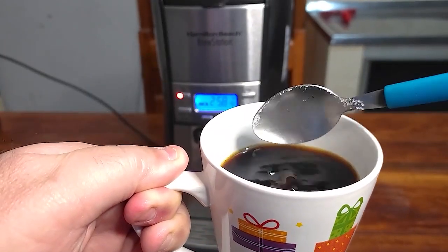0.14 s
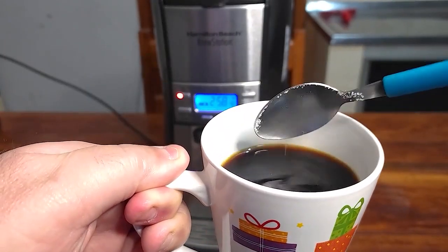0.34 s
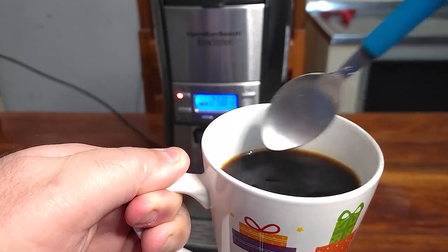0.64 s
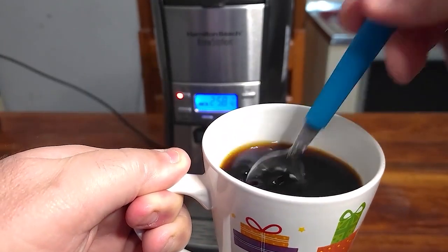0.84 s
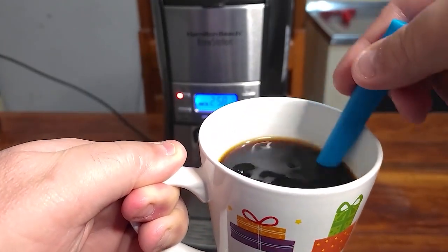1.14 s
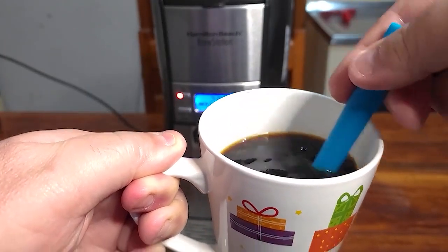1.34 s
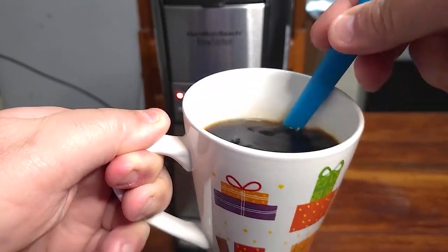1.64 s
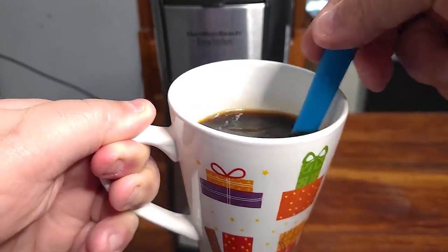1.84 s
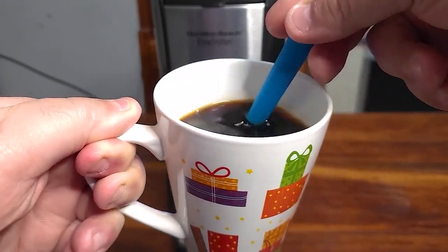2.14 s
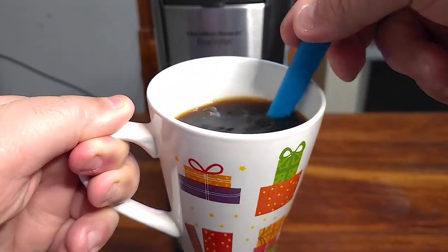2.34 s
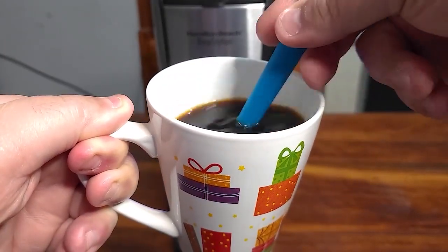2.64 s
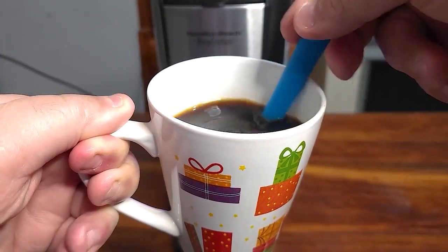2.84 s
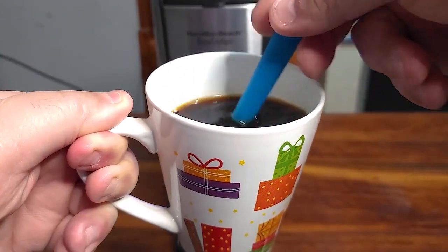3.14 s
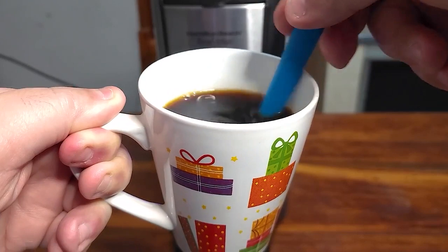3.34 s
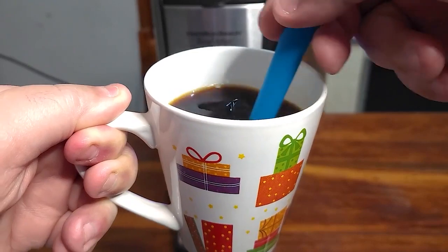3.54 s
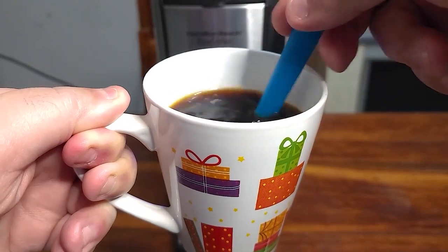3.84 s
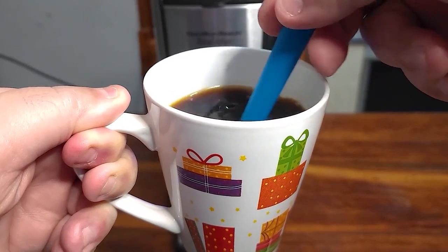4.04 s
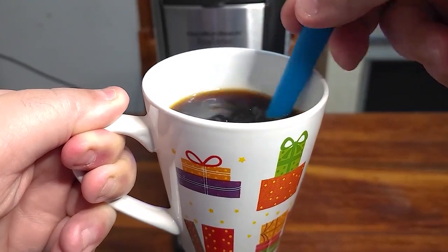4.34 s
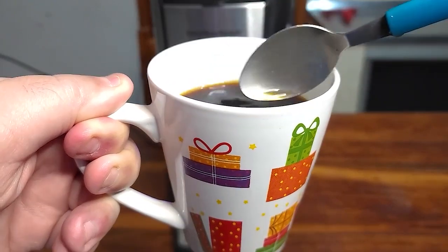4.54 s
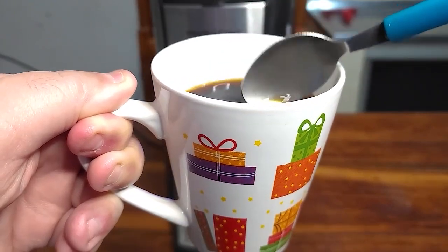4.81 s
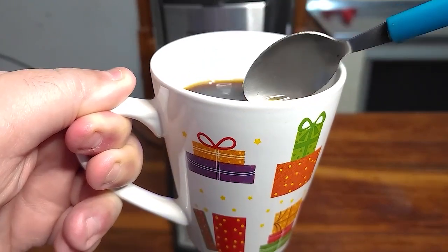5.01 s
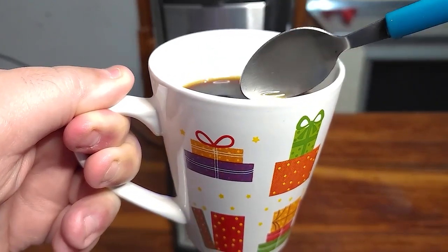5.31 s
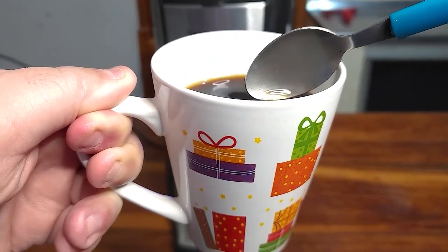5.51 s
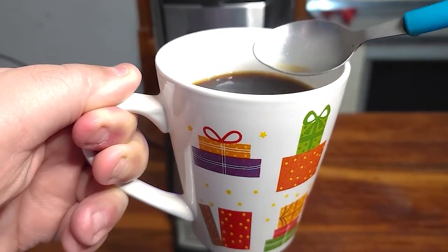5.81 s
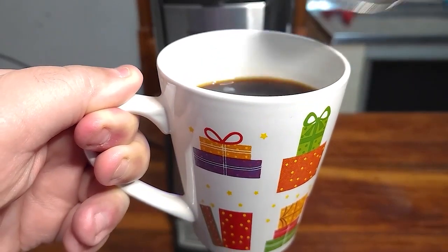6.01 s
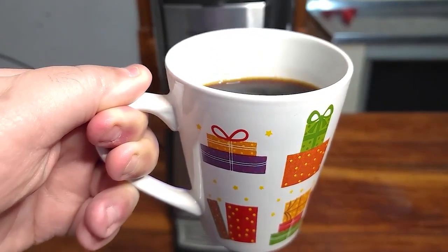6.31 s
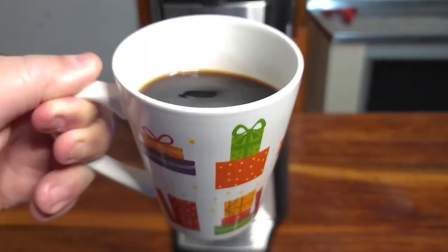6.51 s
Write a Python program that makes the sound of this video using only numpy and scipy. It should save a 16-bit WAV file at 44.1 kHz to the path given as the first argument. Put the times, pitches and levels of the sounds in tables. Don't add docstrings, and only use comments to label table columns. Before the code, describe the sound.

Close in a quiet kitchen, a dry metal spoon strikes a ceramic mug's rim with one bright, short clink. After a pause it stirs the coffee with irregular damped clinks, dull wall knocks and faint sugary scraping. Several ringing rim taps follow, alternately firm and soft, ending on a firm one. A low fridge hum lies beneath; a phone's noise suppression thins the background after loud hits.

```python
import sys
import numpy as np
from scipy import signal
from scipy.fft import rfft, irfft
from scipy.io import wavfile
from scipy.ndimage import uniform_filter1d

SR = 44100
rng = np.random.default_rng(int(sys.argv[2]) if len(sys.argv) > 2 else 0)


def how_loud(loudness_db):
    steps = np.asarray(loudness_db, float) / 20
    return 10 ** steps


def store_pcm(level_fs):
    pcm = np.round(np.clip(level_fs, -1, 1) * 32767).astype(np.int16)
    wavfile.write(sys.argv[1], SR, np.atleast_2d(pcm).T)


N = 293946


def evened(x):
    return x / np.sqrt(np.mean(x ** 2) + 1e-20)


def smoothed_twice(x, size, axis=-1):
    return uniform_filter1d(uniform_filter1d(x, size, axis=axis), size, axis=axis)


def read_spectrum(points, hz):
    point_hz, value = np.transpose(points)
    return np.interp(np.log(hz + 1), np.log(point_hz + 1), value)


def shaped_noise(db, size):
    real, imag = rng.standard_normal((db.shape[1], db.shape[0], 2)).T
    spectra = (real + 1j * imag) * how_loud(db)
    return signal.istft(spectra, nperseg=size, noverlap=size * 3 // 4)[1][:N]


def patchy_hiss(spectrum, tilt_db, patchy_db):
    hz = np.fft.rfftfreq(512, 1 / SR)
    patches = rng.standard_normal((len(tilt_db), len(hz)))
    patches = uniform_filter1d(patches, size=24, axis=0)
    patches = evened(uniform_filter1d(patches, size=7, axis=1)).T
    octaves = np.log2(np.maximum(hz, 500) / 4000)[:, None]
    db = read_spectrum(spectrum, hz)[:, None] + patchy_db * patches + tilt_db * octaves
    return evened(shaped_noise(db, size=512))


def fridge():
    # (frequency [Hz], level [dB])
    hum_lines = [(34, -65.5), (60.1, -53.5), (78, -60.5), (118.5, -64), (180.4, -59), (241, -67),
                 (301, -67.5), (361, -69.5), (421, -71.5), (541, -81), (601, -79), (1020, -78.5),
                 (2150, -81)]
    # (frequency [Hz], level [dB per Hz])
    rumble_spectrum = [(12, -41.5), (20, -10.5), (59, 0), (103, -8), (136, -9), (176, 0), (209, -10.5),
                       (298, -6), (327, -14), (425, -9.5), (511, -17.5), (800, -28.5), (1040, -57),
                       (1760, -120)]
    rumble_db, waver_db = -53, 2.0
    t = np.arange(N) / SR
    wobbles = evened(smoothed_twice(rng.standard_normal((len(hum_lines), N // 256 + 1)), 12))
    hum = np.zeros(N)
    for (line_hz, line_db), wobble in zip(hum_lines, wobbles):
        drift = np.interp(t, np.arange(len(wobble)) * 256 / SR, wobble)
        hum += how_loud(line_db + waver_db * drift) * np.sin(2 * np.pi * (line_hz * t + rng.random()))
    hz = np.fft.rfftfreq(4096, 1 / SR)
    shape_db = read_spectrum(rumble_spectrum, hz)[:, None] + np.zeros(N // 1024 + 5)
    return np.sqrt(2) * hum + how_loud(rumble_db) * evened(shaped_noise(shape_db, size=4096))


def air():
    # (frequency [Hz], level [dB per Hz])
    air_spectrum = [(410, -31), (700, 0), (1420, -3.5), (1750, -8.5), (2240, -10), (4990, -24), (6150, -19),
                    (8420, -26), (10100, -43.5), (16000, -58.5)]
    # (time [s], level [dB])
    air_course = [(0, -62.5), (0.102, -62.5), (0.501, -68.5), (1.2, -68.5), (2.5, -66.5), (4.5, -70),
                  (6.2, -70), (6.67, -65)]
    time_s, course_db = np.transpose(air_course)
    gain = how_loud(np.interp(np.arange(N) / SR, time_s, course_db))
    return gain * patchy_hiss(air_spectrum, np.zeros(N // 128 + 5), patchy_db=1.5)


def grit():
    # (start [s], length [s], share before the peak [0-1],
    # peak level [dB], brightness [dB per octave])
    strokes = [(1.078, 0.383, 0.374, -66, -0.5), (1.521, 0.3352, 0.583, -50.5, 2.5),
               (1.902, 0.105, 0.11, -71.5, -3), (2.039, 0.209, 0.82, -73, 8.5),
               (2.218, 0.285, 0.59, -62, 0.5), (2.618, 0.152, 0.835, -63.5, 2),
               (2.765, 0.39, 0.063, -60.5, -2.5), (3.18, 0.272, 0.21, -58.5, 4.5),
               (3.727, 0.293, 0.088, -62.5, 6), (4.277, 0.202, 0.59, -61, -3),
               (6.284, 0.278, 0.372, -59, -3)]
    # (frequency [Hz], level [dB per Hz])
    hiss_spectrum = [(880, -7), (1500, -1), (1640, -7), (2180, -1.5), (2900, -5.5), (4380, -9), (4780, -10),
                     (7080, -9), (9150, -17.5), (15700, -23)]
    # (frequency [Hz], level [dB], t60 [s])
    singing_modes = [(1649, -1, 0.178), (4840, -12, 0.146), (5600, -2, 0.096), (7300, -17.5, .05)]
    # (stroke start [dB], peak [dB], end [dB])
    singing_course = (-69, -71, -82)
    rise_db, fall_db, onset_tilt_db = -7.5, -19, 1
    t = np.arange(N) / SR
    frame_s = np.arange(N // 128 + 5) * 128 / SR
    start, length, share, peak_db, bright_db = np.transpose(strokes)[:, :, None]
    knots = np.hstack([0 * share, np.clip(share, .02, .98), 1 + 0 * share])
    knot_s = (start + length * knots).ravel()
    hiss_db = (peak_db + [rise_db, 0, fall_db]).ravel()
    tilt_db = (bright_db + [onset_tilt_db, 0, 0]).ravel()
    sing_db = np.tile(singing_course, len(strokes))
    moving = uniform_filter1d(((t > start) & (t < start + length)).any(0) * 1., size=400)
    hiss = patchy_hiss(hiss_spectrum, np.interp(frame_s, knot_s, tilt_db), patchy_db=3.5)
    ring_s, body = t[:8000], np.zeros(8000)
    for mode_hz, mode_db, t60_s in singing_modes:
        body += how_loud(mode_db - 60 * ring_s / t60_s) * np.sin(2 * np.pi * mode_hz * ring_s)
    singing = evened(signal.oaconvolve(rng.standard_normal(N), body)[:N])
    singing = singing * (t < start[-1])
    hiss = how_loud(np.interp(t, knot_s, hiss_db)) * hiss
    return moving * (hiss + how_loud(np.interp(t, knot_s, sing_db)) * singing)


def kitchen_echo(x):
    # (frequency [Hz], t60 [s])
    room_decay = [(800, 0.27), (2000, 0.44), (6000, 0.295), (16000, 0.3)]
    taps = np.zeros(SR // 2)
    at = np.arange(200, SR // 2 - 20, 20)
    taps[at + rng.integers(0, 20, len(at))] = rng.choice([-1., 1.], len(at))
    hz, t, z = signal.stft(taps, SR, nperseg=256)
    decay = how_loud(-60 * t / read_spectrum(room_decay, hz)[:, None])
    tail = signal.istft(z * decay, SR, nperseg=256)[1]
    return signal.fftconvolve(x, tail / np.linalg.norm(tail))[:N]


def family_levels(rows, law):
    time_s, bell_db, lean_db, hard_db = np.transpose(rows)
    wall_db, wall_lean, upper_db, upper_lean, upper_hard = law
    wall = wall_db + wall_lean * lean_db
    upper = upper_db + upper_lean * lean_db + upper_hard * hard_db
    offsets_db = np.array([0 * time_s, lean_db, wall, upper, hard_db])
    return np.column_stack([time_s, (bell_db + offsets_db).T])


def blows(rows, modes, crack_db, crack_s, wash_db, quick_s, oval_s, late_db, spread_db, detune):
    # (low edge [Hz], high edge [Hz])
    family_edges = [
        (5150, 6150),
        (0, 1900),
        (1900, 5150),
        (6150, 9200),
        (9200, 20000),
    ]
    # (frequency [Hz], level [dB], t60 [s])
    oval_modes = [(1575, -15, .2), (1648.7, 3.5, 0.26)]
    hz, db, t60_s = np.transpose(oval_modes + modes)[:, :, None]
    t, out = np.arange(SR // 3) / SR, np.zeros(N + SR)
    damped_s = np.where(hz < 1900, oval_s, quick_s * (2000 / hz) ** 0.62)
    fading = how_loud(-60 * t / np.minimum(t60_s, damped_s))
    late = how_loud(late_db - 60 * t / t60_s)
    flutters = rng.standard_normal((len(rows), len(hz), 50))
    luck = rng.standard_normal((len(rows), len(hz), 2))
    crackle = rfft(rng.standard_normal((len(rows), 8192)))
    band_hz = np.fft.rfftfreq(8192, 1 / SR)
    burst = how_loud(crack_db - 60 * t[:8192] / crack_s) + how_loud(wash_db - 60 * t[:8192] / .16)
    for (time_s, *family_db), chance, contact, flutter in zip(rows, luck, crackle, flutters):
        wavering = 0.46 + np.where(hz < 1900, .25, .9) * signal.resample(flutter, len(t), axis=1)
        glance = np.clip((-36.5 - max(family_db)) / 12, 0, 1)
        pitch_hz = hz * (1 + (0.001 + detune * glance * (hz > 1900)) * chance[:, 1:])
        envelope = how_loud(db + spread_db * chance[:, :1]) * (fading + late * wavering)
        rings = envelope * np.sin(2 * np.pi * pitch_hz * t)
        for (low, high), blow_db in zip(family_edges, family_db):
            ring = rings[(hz[:, 0] >= low) & (hz[:, 0] < high)].sum(0)
            ring /= np.std(ring[:300])
            in_band = (band_hz >= max(low, 1300)) * (band_hz < high)
            ring[:8192] += burst * evened(irfft(contact * in_band))
            onset_s = .0009 + 0.001297 * glance + .0012 * (high < 2000)
            onset = np.minimum(t / onset_s, 1) ** 2
            out[round(time_s * SR):][:len(t)] += how_loud(blow_db) * ring * onset
    return out[:N]




def wall_knocks():
    knock_rows = [(1.6305, -47, 9.5, -16), (1.6385, -48, -5.5, -24), (2.2325, -54, 13, -11),
                  (2.3014, -52.5, 12, -15.5), (2.3549, -53, 11.5, -9), (2.824, -54.5, 16, -12.5),
                  (2.9142, -64.5, 18.5, -2.5), (3.315, -50, 3.5, -15.5), (3.3394, -64.5, 23, -10),
                  (3.4208, -73.5, 13.5, -23.5), (3.6164, -73.5, 17, -25), (3.7576, -63.5, 24, 12),
                  (4.282, -40.5, -0.5, -16), (4.346, -57.5, 17, -10)]
    wall_modes = [(1898, 20, 0.01), (2754, -18, 0.01), (3572, -8, 0.014), (4744, -15, 0.106),
                  (5730, -1, .05), (5558, 4.5, 0.05), (6370, 1, 0.01), (6730, 9, 0.05), (7660, 0.5, 0.19),
                  (9120, -16.5, 0.018), (10805, -0.5, 0.027), (14450, -19, 0.0067)]
    knock_law = (-10, 1.2797, 2, 0.4035, 0.4967)
    return blows(family_levels(knock_rows, knock_law), wall_modes, crack_db=0, crack_s=0.035, wash_db=-21,
                 quick_s=.05, oval_s=0.1, late_db=-17.5, spread_db=1.7, detune=0.043)


def stirring():
    stir_rows = [(1.0877, -53, 13.5, 5.5), (1.176, -71.5, 4.5, -17), (1.3269, -62, 10, -5.5),
                 (1.4975, -73.5, 13.5, -15), (1.5233, -42.5, -31, -20.5), (1.9119, -75, 12, 6.5),
                 (1.9194, -66, -1, -9.5), (1.956, -62.5, -8, -9), (2.054, -27.5, -23.5, -12),
                 (2.2728, -55, -3.5, 1), (2.5056, -82.5, 10, 6.5), (2.6163, -55.5, -9, -16),
                 (2.6803, -38.5, -18.5, -12), (2.7819, -54.5, -4, 4), (2.9863, -49.5, 1, -8),
                 (3.117, -67, -21.5, -30), (3.1878, -48.5, -12.5, -23), (3.285, -46, -31, 5.5),
                 (3.6684, -25.5, -35, -15), (4.0054, -42.5, -3.5, -2.5), (4.132, -28.5, -25.5, -7.5),
                 (4.323, -56, -4.5, -6.5)]
    wet_modes = [(2283, -1, 0.018), (3703, -4, 0.034), (4444, -10.5, .03), (4719, -5, 0.28),
                 (5518.5, 10.5, 0.137), (6036, -8.5, 0.193), (6492, 13.5, 0.1), (7120, 8.5, 0.23),
                 (8250, 12, 0.23), (8740, 11.5, 0.123), (10680, 16, 0.13), (11413, 3.5, 0.2),
                 (13220, 5.5, 0.1), (15120, -5.5, .1)]
    stir_law = (1.5, 0.516, 1.75, 0.14, 0.487)
    return blows(family_levels(stir_rows, stir_law), wet_modes, crack_db=-3.24, crack_s=0.0464,
                 wash_db=-20.5, quick_s=0.046, oval_s=0.052, late_db=-21.5, spread_db=10.0, detune=0.024)


def sugar_shake():
    shake_rows = [
        (0.504, -16, -2.5, -14.5),
        (0.5137, -34.5, 4.5, -13.5),
    ]
    loose_modes = [(857, -18, 0.052), (1964, 0, 0.11), (2496, -7.5, .26), (3465.8, -10, 0.33),
                   (4662, -6, 0.48), (4860, 6.5, 0.041), (5576, 0, 0.11), (6486, 5, 0.23),
                   (6685, -1.5, .15), (8010, 2, .17), (8254, -2, .3), (9930, 5, 0.055), (10960, -3.5, 0.24),
                   (13220, 0.5, .12)]
    shake_law = (-0.5, 1.23, 1.5, -1.05, 0.3374)
    return blows(family_levels(shake_rows, shake_law), loose_modes, crack_db=-3.5, crack_s=0.014,
                 wash_db=-19.5, quick_s=0.02, oval_s=0.036, late_db=-21, spread_db=0, detune=0)


def rim_taps():
    tap_rows = [
        (3.48, -17.5, -20, -25.5),
        (4.433, -40, 6.5, -18.5),
        (4.8309, -20, -2.5, -14),
        (5.003, -25.5, -0.5, -17.5),
        (5.234, -27, 0.5, -17.5),
        (5.451, -39.5, 4, -22.5),
        (5.6511, -42, 4.5, -22.5),
        (5.8345, -20, -11, -19.5),
    ]
    rim_modes = [(2069, -3, 0.0082), (3032.5, 1, 0.013), (3700, -0.5, 0.015), (4724.6, 2, 0.386),
                 (4885, -4.5, 0.42), (5522, -11, 0.1), (5741, 1, 0.1633), (6680, -1, .08), (6964, 0, 0.23),
                 (8736, -6, 0.15), (10428, 4.5, 0.36), (11550, 4, 0.27), (14350, 5, .07), (15300, 0.5, .13)]
    tap_law = (-4.5, 0.7455, 6, 0.3723, 0.5276)
    return blows(family_levels(tap_rows, tap_law), rim_modes, crack_db=-2, crack_s=0.01755, wash_db=-18.5,
                 quick_s=0.085, oval_s=0.0866, late_db=-20.5, spread_db=2.7, detune=0)


def scene():
    clinks = sugar_shake() + stirring() + wall_knocks() + rim_taps()
    echo = how_loud(-13) * kitchen_echo(clinks)
    return np.tile(clinks + echo + grit() + air() + fridge(), (2, 1))


def roll_off(x):
    return signal.sosfilt(signal.butter(12, 17490, fs=SR, output="sos"), x)


def record(dry):
    memory_fade_db_per_s, margin_db, duck_slope, max_duck_db = 40, 11, 1.6, 30
    hz, t, z = signal.stft(dry[0], SR, nperseg=1024, noverlap=768)
    power = uniform_filter1d(abs(z) ** 2, size=3, axis=0)
    power = uniform_filter1d(power, size=5, axis=1) + 1e-16
    keep = how_loud(-2 * memory_fade_db_per_s * 256 / SR)
    memory = signal.lfilter([1 - keep], [1, -keep], uniform_filter1d(power, size=21, axis=0))
    excess_db = 10 * np.log10(memory / power) - margin_db
    duck_db = uniform_filter1d(np.clip(duck_slope * excess_db, 0, max_duck_db), size=3)
    edge = np.clip((16900 - hz[:, None]) / 600, .003, 1)
    clean = signal.istft(z * edge * how_loud(-duck_db), SR, nperseg=1024, noverlap=768)[1][:N]
    lead = np.pad(rng.standard_normal(700) * np.linspace(.1, 1, 700), (0, 701))
    treble = signal.lfilter(*signal.butter(2, 1200, "high", fs=SR), clean)
    smear = signal.oaconvolve(treble, lead / np.linalg.norm(lead), "same")
    clean = clean + how_loud(-30.5) * smear
    return roll_off(np.tile(clean, (2, 1)))


dry = scene()
out = record(dry)
store_pcm(out)
```